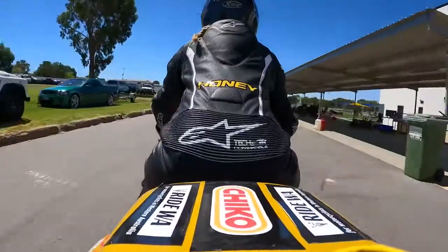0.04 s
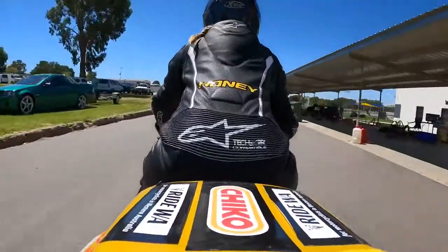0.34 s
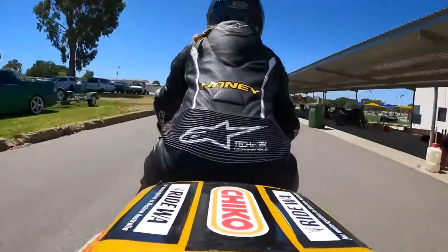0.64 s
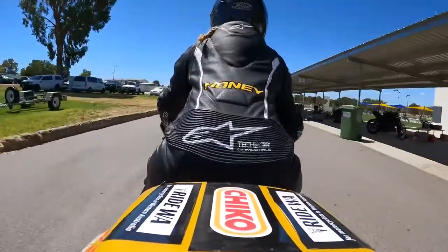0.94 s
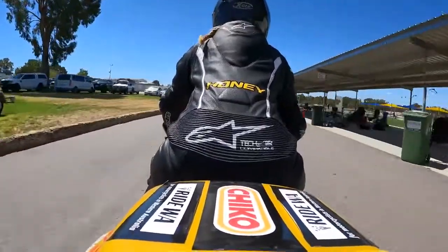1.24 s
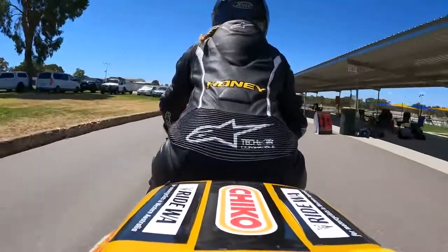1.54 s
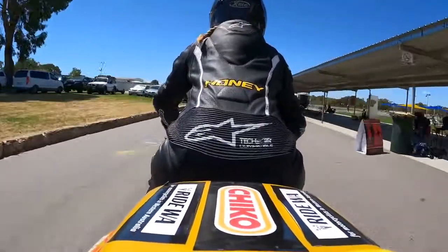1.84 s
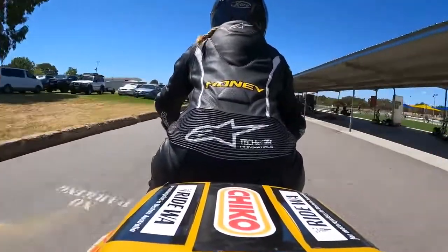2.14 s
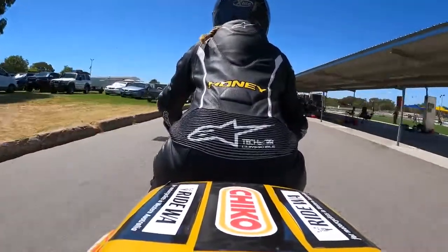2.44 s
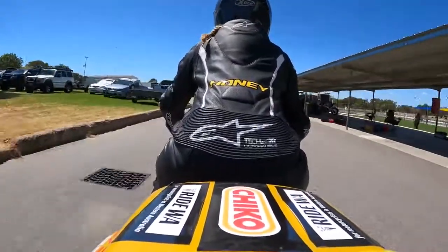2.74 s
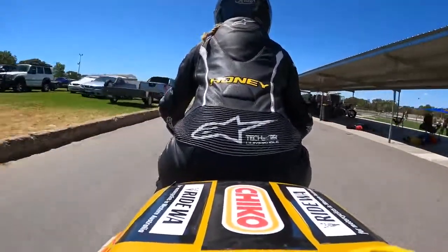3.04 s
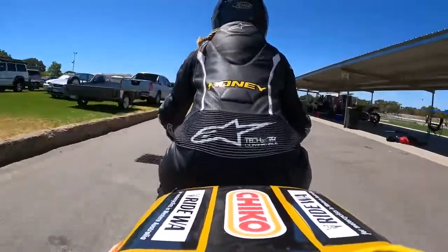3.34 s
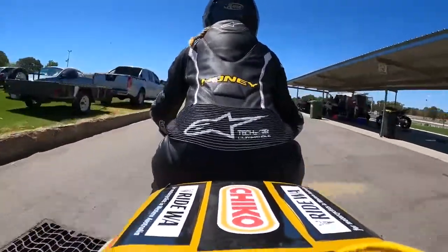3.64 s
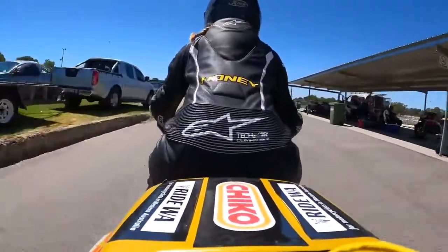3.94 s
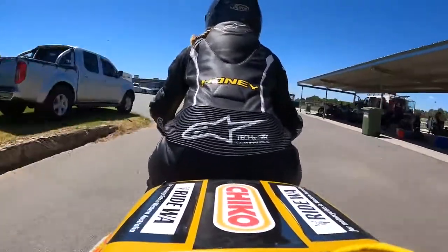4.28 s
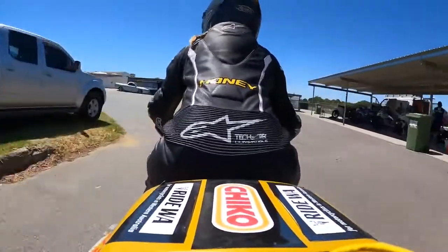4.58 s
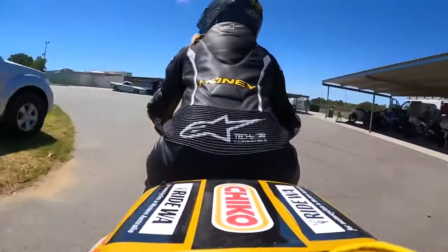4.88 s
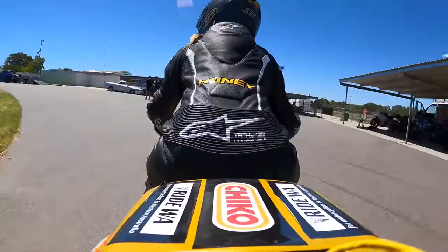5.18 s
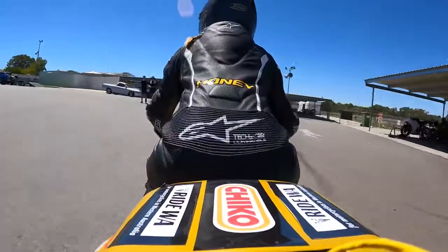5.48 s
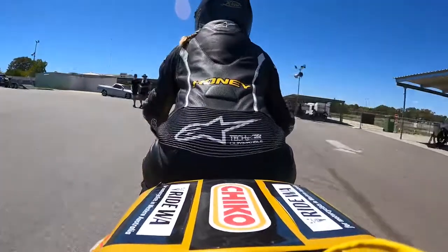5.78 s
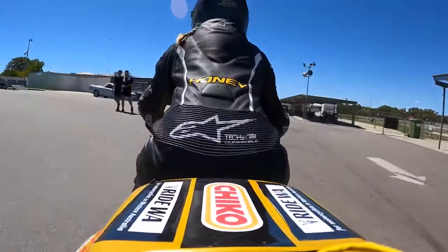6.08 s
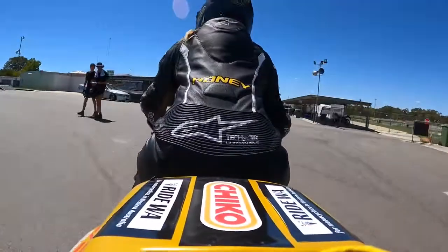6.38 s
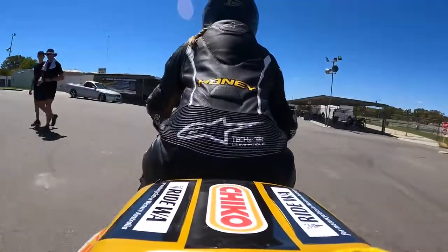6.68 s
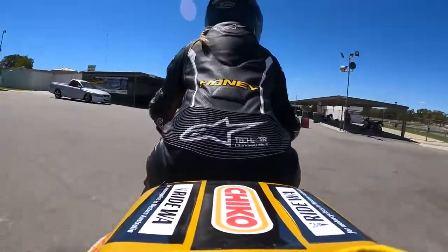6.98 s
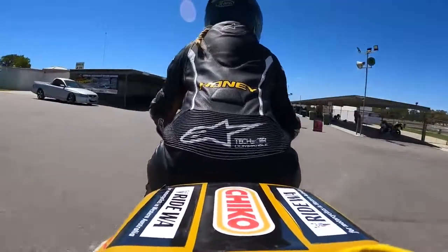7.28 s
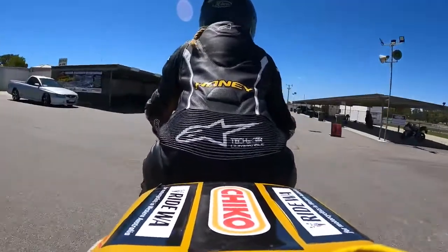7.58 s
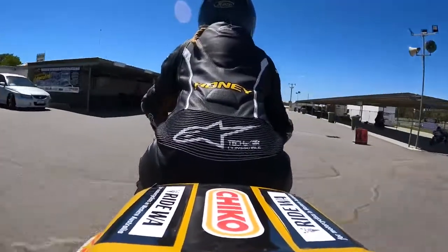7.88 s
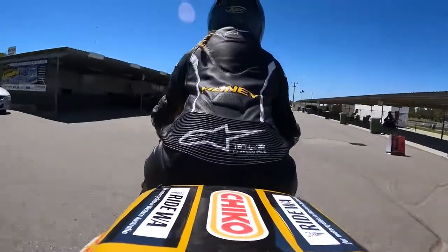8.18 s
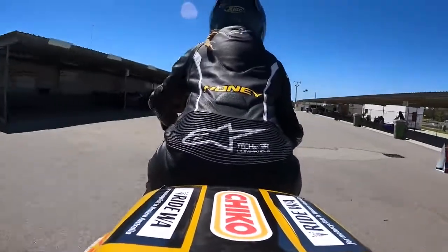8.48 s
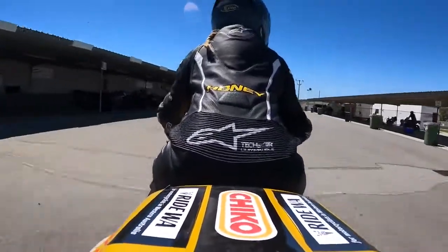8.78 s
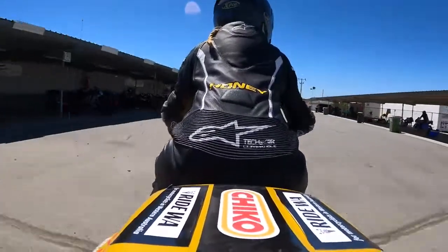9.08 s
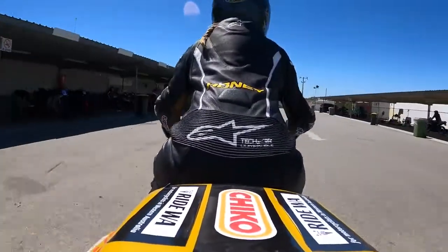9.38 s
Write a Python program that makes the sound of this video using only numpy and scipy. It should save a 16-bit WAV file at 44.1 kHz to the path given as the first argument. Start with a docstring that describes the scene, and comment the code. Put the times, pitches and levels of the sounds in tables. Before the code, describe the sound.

Heard from its tail, a slow-rolling motorcycle hums with gear whine and light wind, coasts with exhaust pops, picks up, and settles into chuffing idle.

```python
"""A small racing motorcycle rolls slowly over asphalt, heard from its tail.
First the exhaust drones on light throttle, one blow a beat, and misfires now and then; gears whine,
the engine clatters, a little wind buffets. At 3.1 s the throttle closes: the cylinder gulps at the
pipe, partial burns burble, collected charge pops and the slack chain snatches.
At 5.5 s the engine pulls again. From 8.8 s the revs fall to a lumpy, chuffing idle."""
import sys
import numpy as np
from scipy import signal
from scipy.fft import rfft, irfft, next_fast_len
from scipy.io import wavfile
from scipy.ndimage import uniform_filter1d, minimum_filter1d, map_coordinates

SR = 44100
rng = np.random.default_rng(int(sys.argv[2]) if len(sys.argv) > 2 else 0)


def generate_wav(sig):
    """Save sig (samples, or channels by samples) to the path in sys.argv[1] as 16-bit PCM at SR."""
    pcm = np.round(np.clip(np.atleast_2d(sig).T, -1, 1) * 32767).astype(np.int16)
    wavfile.write(sys.argv[1], SR, pcm)


N = 415422

# Clean firing: t/s, level/dB, steep front/dB
LOAD = [(0, -1.5, -7), (4.7, -2.5, -13), (5.6, -1, -27), (6.5, -0.9, -21.5), (7.5, -0.97, -15.5),
        (8.7, -0.8, -17), (8.95, -2.5, -27), (9.15, -13.5, -25), (9.42, -17, -17)]
# Failed beats, throttle open: t/s, level/dB re clean firing
MISFIRES = [(0.6012, -12), (0.7378, -14), (0.7898, -18), (1.0315, -14), (1.1676, -20), (1.2416, -13),
            (1.2942, -12), (1.5045, -17), (1.6303, -11), (2.2018, -18), (2.9585, -13), (5.5793, -11),
            (8.4011, -10), (8.4768, -15), (8.5774, -15), (8.7493, -8)]
# Loudest firings off throttle: t/s, level/dB re clean firing
POPS = [(3.1316, 0), (3.1429, 1), (3.1876, -1), (3.2106, -1), (3.2784, 1), (3.3885, 2), (3.4776, 0),
        (3.5108, -1), (3.5568, 1), (3.5906, -1), (3.7261, 1), (3.8084, 0), (3.864, -1), (3.9229, 0),
        (4.006, 0), (4.1141, 0), (4.1275, -1), (4.1517, 0), (4.213, 1), (4.2497, 0), (4.2743, 0),
        (4.3364, .5), (4.399, 1), (4.4872, 1.5), (4.5131, 1), (4.5902, 1), (4.6032, .5), (4.6671, 2),
        (4.7586, 1), (4.7851, 2.5), (4.8644, 2), (4.891, -1.5), (4.9178, 0), (4.9447, -1), (4.9854, 1.5),
        (5.0124, .5), (5.0663, 2), (5.1351, .5), (5.1619, .5), (5.19, 1.5), (5.2721, 1.5), (5.2861, 0),
        (5.3, -2), (5.3138, 1.5), (5.3414, -2), (5.3697, 1.5), (5.3979, 1.5), (5.4261, .5), (5.4543, 1),
        (5.4679, -2), (5.4821, 1.5), (8.7615, 2.5), (8.8802, -1), (8.9892, -1)]
def firings(turns, gain_db, partial_db, jitter_s, relief):
    """Throttle open: a blow per beat, some lean or misfired. Closed: gulps, partial burns and pops."""
    beats = np.flatnonzero(np.diff(np.floor(turns)) > 0)
    luck, burn = rng.random((N // 20, 2))[:len(beats)].T
    size_scatter, time_scatter, front_scatter = rng.standard_normal((N // 20, 3))[:len(beats)].T
    times = beats / SR + jitter_s * time_scatter
    load_db, front_db = (curve[beats] for curve in curves(LOAD))
    driven = throttle_open(times)
    lean = luck < .35 * octaves()[beats]  # weak burns above cruise
    stray_pop = (luck < .05) & (times < THROTTLE[-1][1])
    fired = driven | stray_pop
    db = np.where(driven, .2 * size_scatter - 9.5 * lean, 2 + .5 * size_scatter)
    for s, level in MISFIRES:
        db[np.argmin(np.abs(times - s))] = level

    popped = np.array([np.argmin(np.abs(times - s)) for s, _ in POPS])
    fired[popped - 1] = driven[popped - 1]  # charge collects for a beat before it pops
    burn[popped - 1] /= 2
    times[popped], db[popped] = np.transpose(POPS)
    fired[popped] = True
    front_db[popped] += 3.2 * db[popped]  # harder pop, steeper front

    full = fired * amp(gain_db + load_db + db)
    steep = full * amp(front_db + 1.3 * front_scatter)
    partial = ~fired * burn * amp(gain_db + load_db + partial_db)
    vacuum = ~fired * (1 - relief * burn) * amp(curves(VACUUM)[0][beats])  # partial burns relieve it
    blow = pipe_blow(turn_hz=567, edge_hz=2500)
    front = np.gradient(blow) / np.abs(np.gradient(blow)).max()
    unfired = strike(times, partial, pipe_blow(turn_hz=344, edge_hz=480))
    unfired += gulps(times, vacuum, early_s=.00061, jitter_s=.00005, round_hz=380)
    blows = strike(times, full, blow) + strike(times, steep, front)
    return blows + chambers(unfired) + rasp(times, full, gain_db=-38.5, t60_s=.03)


# Spectrum of one exhaust blow: f/Hz, level/dB
PIPE = [(25, -25), (55, -9), (78, -10.5), (100, -15), (148, 2.5), (190, 6.5), (225, 3), (290, -6),
        (380, -6.5), (590, -15), (665, -21), (745, -23), (850, -35), (1030, -34.5), (1150, -47),
        (1300, -44.5), (1600, -57.5), (2400, -72)]
def pipe_blow(turn_hz, edge_hz, size=8192):
    """Pipe ring after one firing: a brief suck, a peak of 1, a few swings."""
    hz = np.fft.rfftfreq(size, 1 / SR)
    ring = causal(amp(along(PIPE, hz)) * lowpass(hz, edge_hz, 4))
    allpass = (turn_hz - 1j * hz) / (turn_hz + 1j * hz)
    blow = irfft(ring * allpass)
    return blow / np.abs(blow).max()


# Soft firings near idle: t/s, level/dB
CHUFFS = [(8.906, -6), (8.957, -7.5), (9.061, -4), (9.081, 1), (9.122, -9.5), (9.168, -2), (9.188, 2),
          (9.212, 2.5), (9.26, 1.5), (9.312, 0), (9.341, 1), (9.369, 1)]
def chuffs(gain_db):
    """Idle firings burn slowly: round, dull blows."""
    times, db = np.transpose(CHUFFS)
    return strike(times, amp(gain_db + db), pipe_blow(turn_hz=202, edge_hz=410))


# Cylinder vacuum off throttle: t/s, level/dB, roundness/0-1
VACUUM = [(3.09, -15.5, 0.2), (3.35, -5.5, 0.4), (4.1, -4.5, 0.4), (5.1, -8, 0.9), (5.5, -14.5, .15),
          (8.77, -6.5, 0.7), (9.05, -5.5, .9), (9.12, -9, 1), (9.2, -11, 1), (9.42, -21, .9)]
def gulps(times, depths, early_s, jitter_s, round_hz):
    """Unfired beats suck gas back up the pipe; slow gas rounds the gulp."""
    jitter = jitter_s * rng.standard_normal(N // 20)[:len(times)]
    shape = gulp(fall_s=.00075, shut_s=.0003, echo_s=.0052, echo_width_s=.0015, echo_gain=.42)
    sharp = signal.fftconvolve(impulses(times - early_s + jitter, depths), shape, "same")
    rounded = filtered(sharp, lambda hz: lowpass(hz, round_hz, 6))
    roundness = np.clip(curves(VACUUM)[1], 0, 1)
    return filtered(sharp + roundness * (rounded - sharp), lambda hz: highpass(hz, 30))


def gulp(fall_s, shut_s, echo_s, echo_width_s, echo_gain, size=2048):
    """Sharp pressure dip; the open pipe end returns it inverted and rounded."""
    t = (np.arange(size) - size // 2) / SR
    dip = np.exp(-np.logaddexp(-t / fall_s, t / shut_s))
    echo = np.exp(-((t - echo_s) / echo_width_s) ** 2)
    return echo_gain * echo - dip / dip.max()


# Gas churning in the pipe: f/Hz, level/dB
BURBLE = [(15, -28.5), (40, -5), (100, -3), (165, 5), (240, 6), (310, 0), (430, -8), (620, -17),
          (850, -38.5), (1500, -51), (5000, -110)]
def pipe_gas(turns, bunching, second_db, waver_db):
    """Unburnt air is pumped out once a beat; partial burns churn in puffs."""
    angle = 2 * np.pi * turns
    puffs = np.exp(bunching * np.cos(angle - 1)) * rng.standard_normal(N)
    pump = unit(-np.cos(angle + .26 * wobble(38)) - amp(second_db) * np.cos(2 * angle))
    pump *= amp(waver_db * wobble(25)) * running_gain(base_db=-26, db_per_oct=-4, open_db=-10.5)
    burble = chambers(coloured(puffs, BURBLE)) * running_gain(base_db=-18, db_per_oct=7.5, open_db=-7.5)
    lean_gain = amp(7 * airflow() * octaves())  # mixture leans out with speed on open throttle
    return lean_gain * burble + pump


def lull(depth, width_s):
    """Gain dip just before each pop or chuff, while charge collects."""
    window = np.hanning(round(2 * width_s * SR))
    dips = signal.fftconvolve(impulses(bang_times() - width_s), window, "same")
    return 1 - np.clip(depth * dips, 0, 1)


# Silencer response: f/Hz, level/dB
CHAMBERS = [(150, -0.5), (255, 0), (300, -4.5), (358, 3), (430, -0.5), (490, 6.5), (545, -1), (603, 9),
            (675, -3), (760, 1.5), (850, -7.5), (960, -1), (1300, -10)]
def chambers(gas, size=4096):
    """Slow gas rings the silencer chambers."""
    hz = np.fft.rfftfreq(size, 1 / SR)
    ring = irfft(causal(amp(along(CHAMBERS, hz))))
    return signal.oaconvolve(gas, ring)[:N]


# Turbulence at the outlet: f/Hz, level/dB
RASP = [(200, -24), (600, -5.5), (750, -1), (845, -1.5), (960, 0), (1160, -2), (1350, -4.5), (1900, -9.5),
        (4000, -41)]
def rasp(times, sizes, gain_db, t60_s):
    """Each blow drags a burst of turbulence out of the pipe."""
    bursts = strike(times, sizes, decay(t60_s))
    return amp(gain_db) * bursts * coloured(rng.standard_normal(N), RASP)


# Exhaust beat rate: t/s, f/Hz
SPEED = [(0.0, 95.7), (.18, 96.0), (.3, 95.3), (.4, 96.2), (.58, 95.0), (.7, 95.6), (.85, 95.4),
         (.97, 94.1), (1.1, 96.0), (1.22, 94.4), (1.35, 95.8), (1.47, 93.9), (1.58, 95.6), (1.7, 94.4),
         (1.9, 94.8), (1.98, 93.8), (2.12, 94.7), (2.3, 94.4), (2.43, 93.4), (2.62, 94.4), (2.78, 93.4),
         (2.95, 94.0), (3.08, 92.0), (3.18, 87.2), (3.33, 90.3), (3.59, 89.0), (3.85, 86.5), (4.01, 83.0),
         (4.59, 78.4), (4.77, 75.7), (5.3, 72.2), (5.42, 70.9), (5.53, 72.0), (5.65, 76.6), (5.77, 69.1),
         (5.9, 73.8), (5.95, 72.2), (6.25, 72.7), (6.3, 73.8), (6.72, 74.1), (6.92, 75.9), (7.01, 74.1),
         (7.23, 76.5), (7.32, 75.6), (7.4, 76.8), (7.76, 78.1), (7.9, 77.2), (7.99, 79.7), (8.09, 78.8),
         (8.31, 80.6), (8.44, 79.0), (8.76, 81.8), (8.87, 72.5), (8.95, 64.0), (9.05, 52.0), (9.16, 43.1),
         (9.24, 41.6), (9.31, 36.5), (9.42, 36.1)]
def beat_count(hunting):
    """Running count of exhaust beats; the speed hunts slightly."""
    return np.cumsum(curves(SPEED)[0] * (1 + hunting * wobble(10))) / SR


def octaves(cruise_hz=80):
    """Engine speed in octaves above cruise."""
    return np.log2(curves(SPEED)[0] / cruise_hz)


def crank(turns, size=8000):
    """Crank phase drifts ahead or behind, in step with pops and misfires."""
    marks = np.sort([s for s, _ in list(MISFIRES) + list(POPS)])
    t = np.arange(N) / SR
    lead = np.unwrap(2 * np.pi * (np.interp(marks, t, turns) % 1)) / (2 * np.pi)
    return turns - uniform_filter1d(np.interp(t, marks, lead), size)


# Throttle open: from t/s, to t/s
THROTTLE = [(0, 3.09), (5.5, 8.77)]
def throttle_open(times):
    """True on open throttle."""
    return np.any([(times >= start) & (times < end) for start, end in THROTTLE], axis=0)


def airflow(glide_s=.26):
    """Glides between 0 (throttle closed) and 1 (open)."""
    return uniform_filter1d(throttle_open(np.arange(N) / SR) * 1.0, round(glide_s * SR))


def running_gain(base_db, db_per_oct, open_db):
    """Layer gain that follows speed and throttle."""
    return amp(base_db + db_per_oct * octaves() + open_db * airflow())


def bang_times():
    """Times/s of the listed pops and chuffs."""
    return np.array([s for s, _ in list(POPS) + list(CHUFFS)])


# Piston and chain rattle: f/Hz, level/dB
CLATTER = [(500, -17.5), (740, 3.5), (850, -3.5), (960, 1), (1130, -8), (1550, -9.5), (2300, -14),
           (2700, -20.5), (3200, -19), (3700, -22), (4700, -20.5), (5900, -32), (6700, -30.5),
           (8000, -37.5), (10500, -50.5), (11300, -51.5), (11900, -45.5), (12700, -54), (14000, -65.5)]
# Engine case modes: f/Hz, width/Hz, level/dB
CASES = [(1356, 110, -1.5), (1432, 37, 3.5), (1776, 79, 4), (2123, 140, 0), (2230, 31, -6),
         (2512, 210, 1.5), (2760, 100, -1), (4080, 420, -16), (4570, 220, -20.5), (6500, 230, -22.5)]
def clatter(turns, pulsing, ring_db, gain_db, knock_db, knock_scatter_db, knock_t60_s):
    """Piston and chain rattle and ring the cases; gears knock in their backlash twice a beat."""
    def cases(hz):
        return sum(amp(db) * (1j * hz * width / (mode ** 2 - hz ** 2 + 1j * hz * width)) ** 2
                   for mode, width, db in CASES)

    times = np.flatnonzero(np.diff(np.floor(2 * turns)) > 0) / SR
    size_scatter, time_scatter = rng.standard_normal((len(times), 2)).T
    scatter_db = knock_scatter_db * np.where(throttle_open(times), .35, 1)  # load keeps teeth in contact
    sizes = amp(knock_db + scatter_db * np.minimum(size_scatter, 2))
    knocks = strike(times + .00042 * time_scatter, sizes, decay(knock_t60_s))
    drive = (np.exp(pulsing * np.cos(2 * np.pi * turns)) + knocks) * amp(.62 * wobble(28))
    hiss = coloured(drive * rng.standard_normal((2, N)), CLATTER)
    ring = unit(filtered(drive * rng.standard_normal((2, N)), cases))
    return amp(gain_db) * spread(hiss + amp(ring_db) * ring, LIKENESS)


# Chain, gear mesh, two overtones: cycles/beat, blur/Hz
MESH = [(14, 60), (30.9, 170), (61, 220), (90.5, 350)]
# Same rows: closed-throttle level/dB, open-throttle level/dB, rise/(dB/oct)
WHINE = [(-12.5, -24, 4), (-3.5, -8, 2.5), (-6, -10.5, 3), (-13.5, -18, 1)]
# Gearbox radiation: f/Hz, level/dB
GEARBOX = [(600, -11.5), (1200, 0.5), (1900, 3.5), (2280, -10.5), (2520, -10.5), (2850, -4.5), (3400, -3),
           (4400, -8.5), (5200, -15.5), (5800, -16.5), (6450, -14), (6900, -28.5), (8600, -33)]
def gears(turns, swing_rad, lash, wander, flutter_db):
    """Teeth whine at multiples of engine speed; off throttle, backlash smears them into a rasp."""
    flow, speed_hz = airflow(), curves(SPEED)[0]
    drift = wander * amp(-12 * octaves()) * wobble(45)  # teeth wander more at low speed
    angle = 2 * np.pi * turns + drift + lash * (1 - flow) * wobble(260)
    flutter = unit(amp(flutter_db * wobble(70)))
    whine = np.zeros((2, N))
    for (teeth, blur_hz), (closed_db, open_db, db_per_oct) in zip(MESH, WHINE):
        db = closed_db * (1 - flow) + open_db * flow + db_per_oct * octaves()
        db += along(GEARBOX, teeth * speed_hz)
        whine += amp(db) * blurred(teeth * angle + swing_rad * np.sin(angle), blur_hz)
    return spread(whine * flutter, LIKENESS)


def looseness(open_waver_db, closed_waver_db, slack_db, slack_s):
    """Machine noise gain: higher and less even off throttle; pops and chuffs take up the gear slack."""
    taut = np.minimum(strike(bang_times(), None, np.hanning(round(slack_s * SR))), 1)
    waver_db = np.interp(airflow(), [0, 1], [closed_waver_db, open_waver_db]) * wobble(40)
    return running_gain(base_db=-50.5, db_per_oct=-.5, open_db=-3) * amp(waver_db - slack_db * taut)


# Chain snatches: t/s, length/s, level/dB
SNATCHES = [(3.55, .09, -42.5), (3.765, .1, -42.5), (3.9, .12, -46), (4.04, .11, -43.5), (4.15, .1, -46.5),
            (4.27, .18, -47.5)]
def snatches(turns, blur_hz):
    """The chain's whine swells as its slack run pulls tight."""
    envelope = sum(amp(db) * swell(s, length_s) for s, length_s, db in SNATCHES)
    whine = envelope * blurred(2 * np.pi * MESH[0][0] * turns, blur_hz)
    return np.std(whine) * spread(whine, LIKENESS)


# Narrow swells of chatter or whine: t/s, length/s, f/Hz, width/Hz, level/dB
NARROW_SWELLS = [(3.161, .14, 2634, 170.7, -49), (3.548, .14, 4110, 89.8, -59.5),
                 (3.578, 0.18, 2674, 201.7, -50), (3.809, .11, 4110, 90, -57), (4.35, .13, 4100, 90.4, -57.5),
                 (4.553, .1, 4090, 89.3, -59), (5.1, 0.54, 6620, 222, -69), (5.7, 0.46, 6520, 219, -74.5),
                 (5.648, 0.88, 2103, 121, -56.5), (9.001, .13, 4850, 448, -58.5), (9.212, 0.14, 4810, 450, -60),
                 (9.273, 0.053, 2140, 237, -45.5), (9.35, .055, 2140, 233, -43.5)]
def narrow_swells():
    """Narrow swells, each ringing one case mode: loose parts chatter, and at times the gear whine swells
    through a mode."""
    t = np.arange(N) / SR
    rings = sum(amp(db) * swell(s, length_s) * blurred(2 * np.pi * hz * t, width_hz)
                for s, length_s, hz, width_hz, db in NARROW_SWELLS)
    return np.std(rings) * spread(rings, LIKENESS)


# Single ticks: t/s, level/dB
TICKS = [(2.2578, -38), (3.19, -41.5), (3.424, -46.5), (4.505, -42.5), (5.110, -44), (9.2384, -42.5)]
# Tick spectrum: f/Hz, level/dB
TICK_COLOUR = [(500, -17), (1200, 3), (2800, -4.5), (5200, -12), (7500, -27.5), (13000, -50.5)]
def ticks(t60_s):
    """Dry metal contacts that die at once."""
    times, db = np.transpose(TICKS)
    bursts = strike(times, amp(db), decay(t60_s, SR // 10))
    return bursts * spread(coloured(rng.standard_normal((2, N)), TICK_COLOUR), LIKENESS)


# Wind strength: t/s, level/dB
WIND = [(0, -28), (1, -24), (1.9, -25.5), (2.23, -20.5), (2.65, -36.5), (3, -22.5), (3.6, -20.5),
        (5.15, -25), (5.9, -34.5), (8.25, -35.5), (8.5, -26.5), (8.7, -31), (9.06, -18.5), (9.42, -24)]
# Buffet spectrum: f/Hz, level/dB
BUFFET = [(12, -23.5), (28, 2), (42, 9.5), (50, 15), (65, 4.5), (110, -3), (300, -65.5), (1500, -120)]
def wind(gust_db):
    """Low lumps of air from the rider's wake."""
    rumble = coloured(rng.standard_normal((2, N)), BUFFET)
    gusts = amp(gust_db * np.tanh(wobble(11)))
    return amp(curves(WIND)[0]) * spread(rumble * gusts, likeness=[(50, .95)])


def amp(db):
    """dB to gain."""
    return 10 ** (np.asarray(db) / 20)


def unit(x):
    """Scale to rms 1."""
    return x / np.sqrt(np.mean(x ** 2) + 1e-20)


def along(points, hz):
    """Interpolate (f/Hz, value) points on a log axis."""
    freqs, values = np.transpose(points)
    return np.interp(np.log(hz + 1), np.log(freqs + 1), values)


def curves(rows):
    """Per-sample curve for each column after t/s."""
    times, *columns = np.transpose(rows)
    return [np.interp(np.arange(N) / SR, times, column) for column in columns]


def wobble(rate_hz, step=16):
    """Smooth random curve, rate_hz knots a second."""
    grid = np.arange(0, N + step, step)
    knots = rng.standard_normal(int(N * rate_hz / SR) + 4)
    return np.interp(np.arange(N), grid, map_coordinates(knots, [grid * rate_hz / SR]))


def lowpass(hz, edge_hz, order):
    """Zero-phase low-pass gain."""
    return 1 / (1 + (hz / edge_hz) ** order)


def highpass(hz, edge_hz):
    """Zero-phase high-pass gain."""
    return hz ** 2 / (hz ** 2 + edge_hz ** 2)


def filtered(x, response):
    """Apply a complex frequency response."""
    size = next_fast_len(N + SR // 2)
    return irfft(rfft(x, size) * response(np.fft.rfftfreq(size, 1 / SR)), size)[..., :N]


def coloured(x, spectrum):
    """Shape by (f/Hz, level/dB) points; rms 1."""
    return unit(filtered(x, lambda hz: amp(along(spectrum, hz))))


def causal(gain):
    """Minimum-phase response: rings only after it is struck."""
    cepstrum = irfft(np.log(gain))
    half = len(cepstrum) // 2
    cepstrum[1:half] *= 2
    cepstrum[half + 1:] = 0
    return np.exp(rfft(cepstrum))


def impulses(times, sizes=None):
    """Single-sample kicks; size 1 if none is given."""
    return np.bincount(np.clip(np.round(times * SR).astype(int), 0, N), sizes, N + 1)[:N]


def strike(times, sizes, shape):
    """Start a scaled shape at each time."""
    return signal.oaconvolve(impulses(times, sizes), shape)[:N]


def decay(t60_s, size=SR // 20):
    """Exponential fall, cut after size samples."""
    return amp(-60 * np.arange(size) / SR / t60_s)


def swell(start_s, length_s):
    """Half-sine envelope."""
    return np.sin(np.pi * np.clip((np.arange(N) / SR - start_s) / length_s, 0, 1))


def blurred(angle, blur_hz):
    """Tone smeared into a narrow band, one per ear."""
    return np.array([wobble(blur_hz) * np.cos(angle) + wobble(blur_hz) * np.sin(angle) for _ in range(2)])


# Machine noise between the ears: f/Hz, correlation
LIKENESS = [(800, 0.23), (2000, 0.57), (4500, 0.67), (9000, 0.83)]
def spread(pair, likeness):
    """Mix two unrelated signals to left and right of given correlation; mid at rms 1."""
    angle = lambda hz: np.arccos(np.clip(along(likeness, hz), -1, 1)) / 2
    mid, side = filtered(pair, lambda hz: np.array([np.cos(angle(hz)), np.sin(angle(hz))]))
    return np.array([mid + side, mid - side]) / np.std(mid)


# Bike balance: f/Hz, left minus right/dB
LEFTWARD = [(60, 0), (180, 1.76), (330, 3.5), (480, 7.5), (700, 13), (1000, 11), (1800, 2.5), (4000, -0.1),
            (8000, 1.5)]
def scene():
    """Exhaust and machine noise toward the left, wind in the middle."""
    mean_turns = beat_count(hunting=.0012)
    turns = crank(mean_turns)
    exhaust = firings(turns, gain_db=-4, partial_db=-3, jitter_s=.00006, relief=.56) + chuffs(gain_db=-7)
    gas = pipe_gas(turns, bunching=.46, second_db=-24.5, waver_db=1.5)
    exhaust += gas * lull(depth=.33, width_s=.0065)
    exhaust = filtered(exhaust, lambda hz: lowpass(hz, 3000, 6))  # silencer swallows the treble
    machine = clatter(turns, pulsing=.05, ring_db=-10, gain_db=9,
                      knock_db=-13, knock_scatter_db=8, knock_t60_s=.17)
    machine += gears(mean_turns, swing_rad=.55, lash=.019, wander=.022, flutter_db=1.1)
    machine *= looseness(open_waver_db=.5, closed_waver_db=1.04, slack_db=2.5, slack_s=.045)
    machine += narrow_swells() + snatches(mean_turns, blur_hz=60) + ticks(t60_s=.032)
    left_share = lambda hz: 1 / (1 + amp(-along(LEFTWARD, hz)))
    bike = filtered(exhaust + machine, lambda hz: 2 * np.array([left_share(hz), 1 - left_share(hz)]))
    return bike + wind(gust_db=3)


def limiter(x, ceiling_db, size=600):
    """Gain ducks smoothly around peaks over the ceiling."""
    needed = np.minimum(1, amp(ceiling_db) / (np.abs(x).max(axis=0) + 1e-9))
    return x * uniform_filter1d(minimum_filter1d(needed, size), size)


def record(dry):
    """Peak limit, then a 10 Hz to 14.1 kHz band."""
    return filtered(limiter(dry, ceiling_db=-1.5), lambda hz: (hz < 14100) * highpass(hz, 10))


dry = scene()
out = record(dry)
generate_wav(out)
```